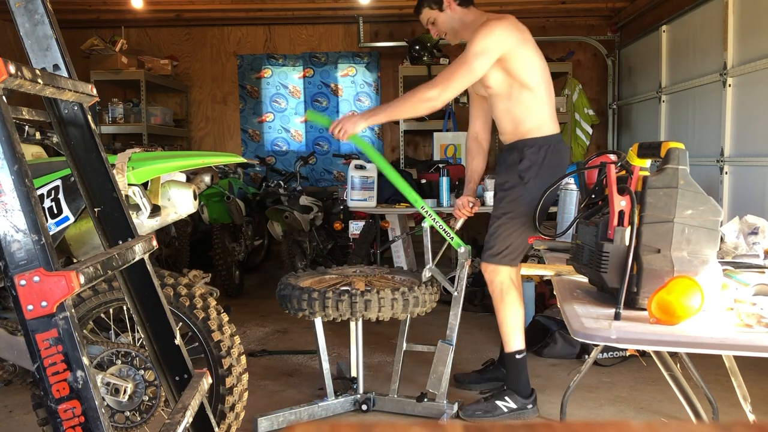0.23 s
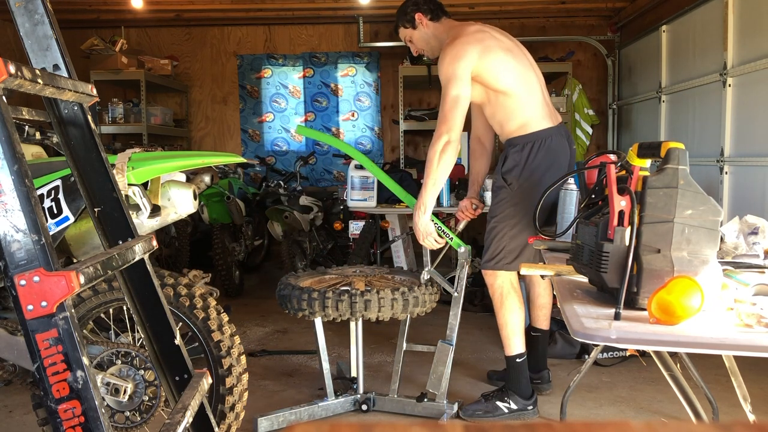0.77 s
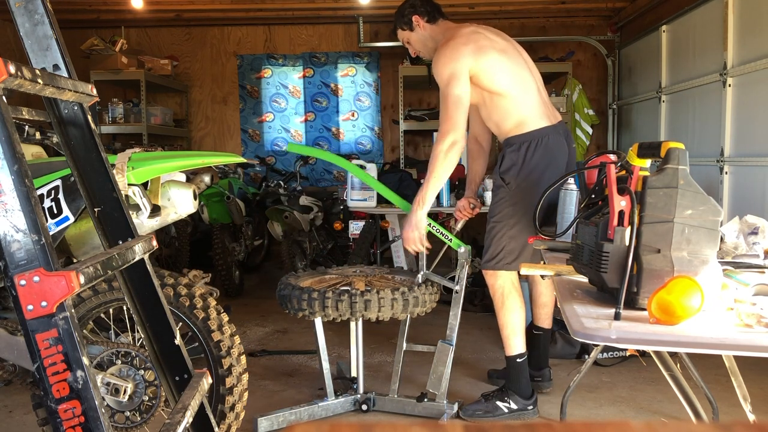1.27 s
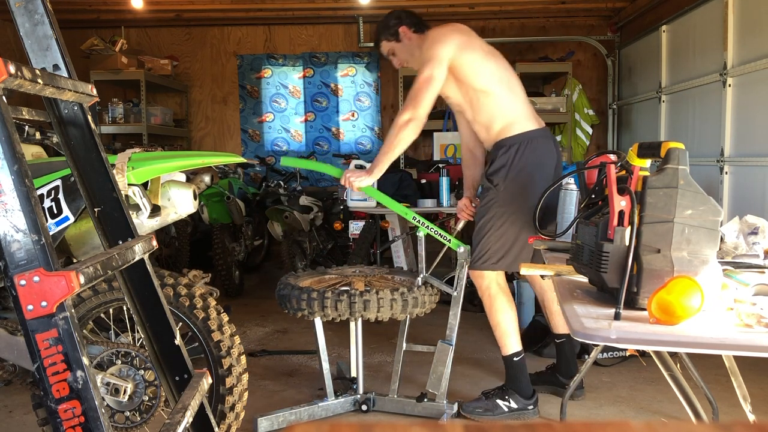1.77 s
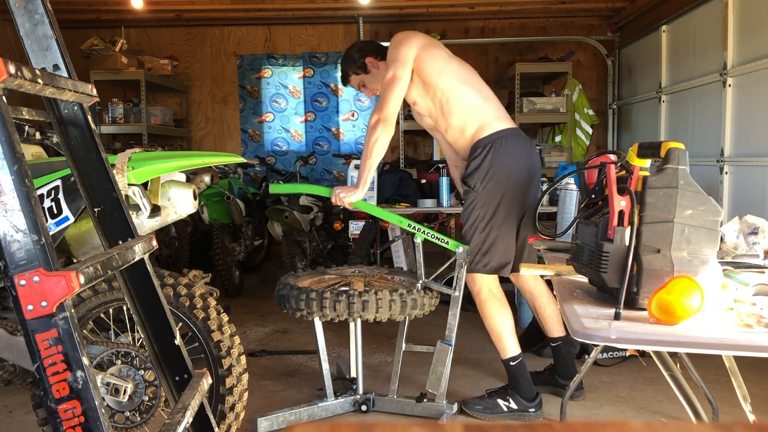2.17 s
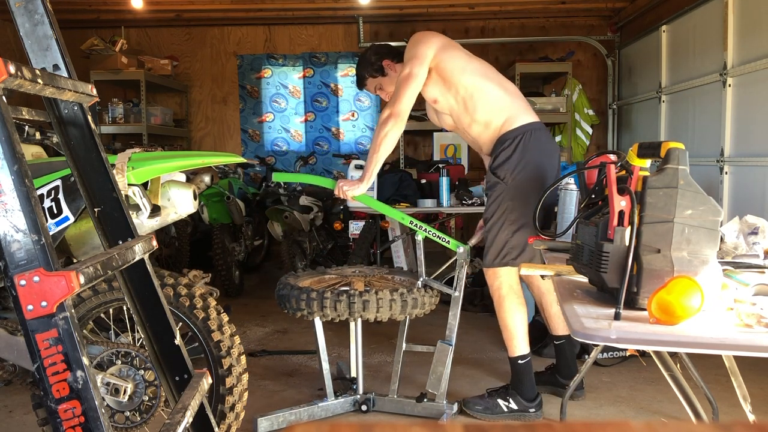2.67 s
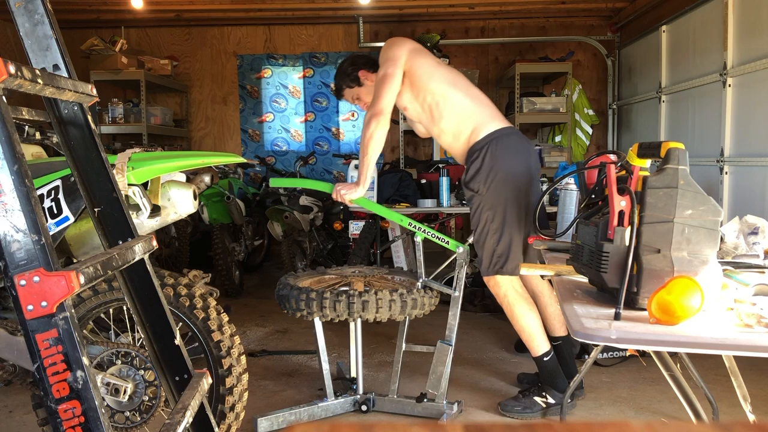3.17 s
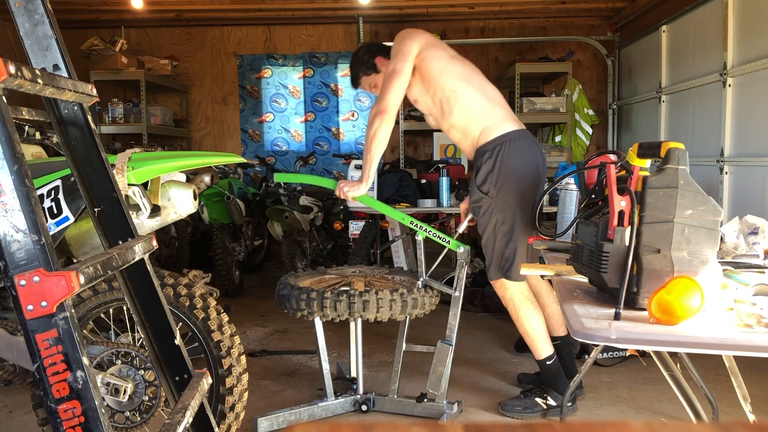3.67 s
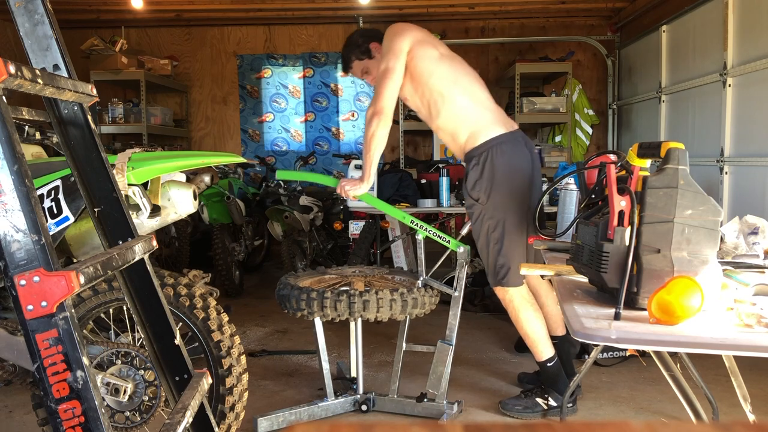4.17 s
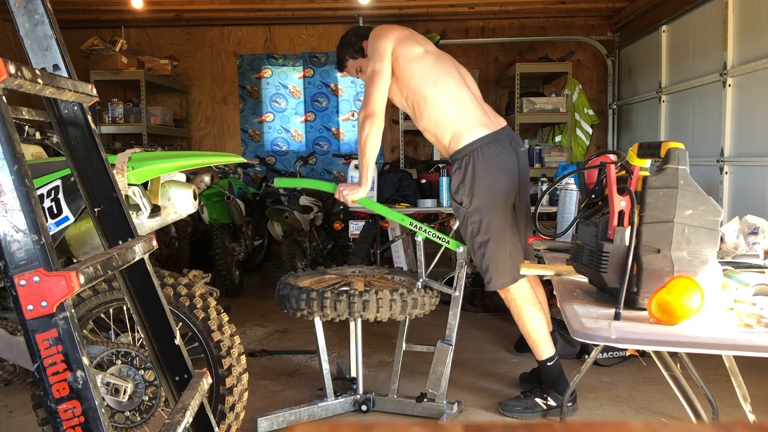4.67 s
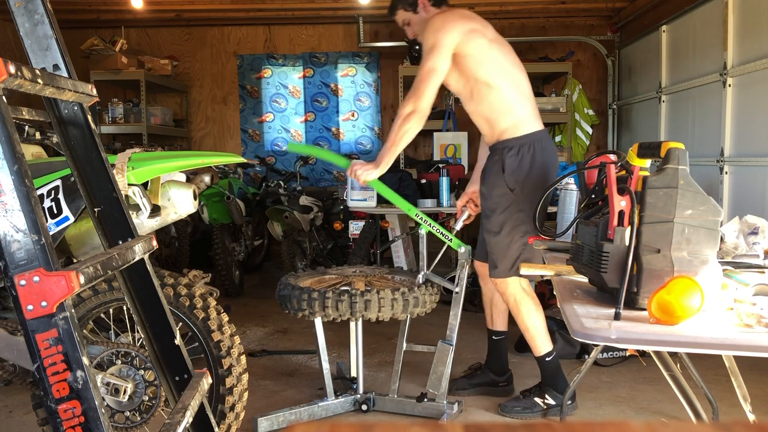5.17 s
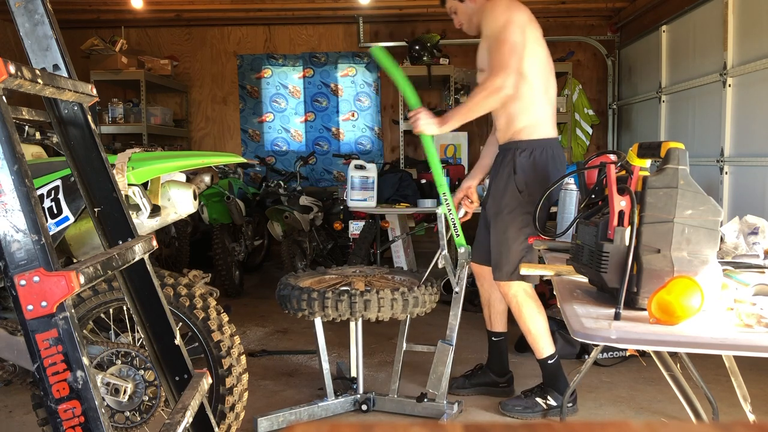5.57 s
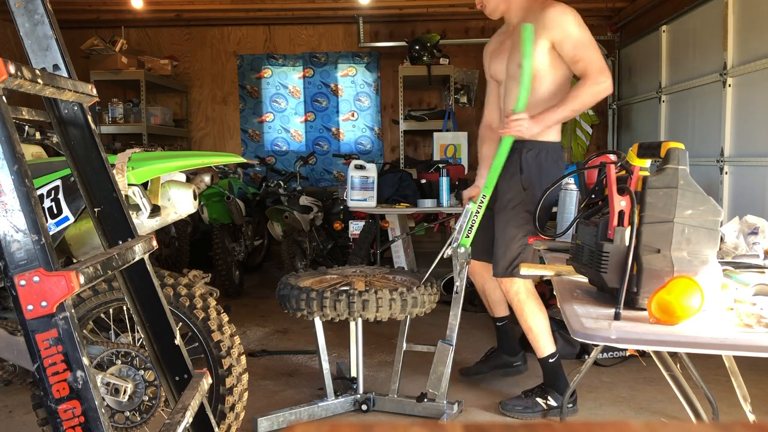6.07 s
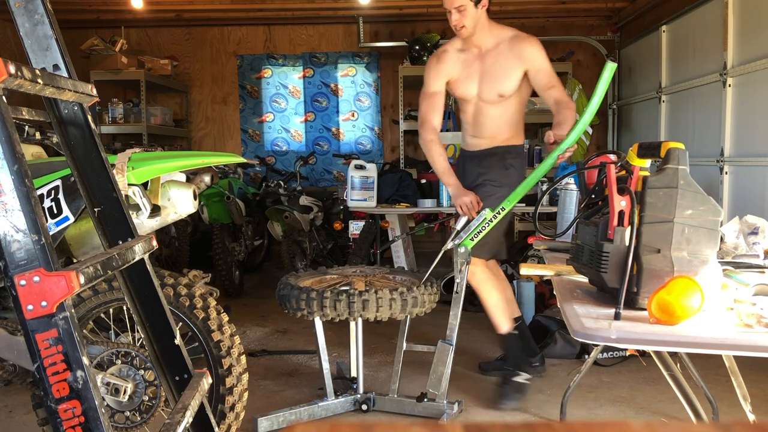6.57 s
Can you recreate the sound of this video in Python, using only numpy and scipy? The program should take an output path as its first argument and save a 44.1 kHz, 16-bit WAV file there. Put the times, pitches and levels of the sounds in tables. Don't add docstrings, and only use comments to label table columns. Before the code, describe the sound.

Sparse metallic clanks, rim knocks, high pin ticks and gritty scrapes as a tire is levered by hand in a bright-echoing garage.

```python
import sys
import numpy as np
from scipy import signal
from scipy.fft import rfft, irfft
from scipy.io import wavfile
from scipy.ndimage import uniform_filter1d

SR = 44100
rng = np.random.default_rng(int(sys.argv[2]) if len(sys.argv) > 2 else 0)


def field_ratio(decibels):
    return 10 ** (np.asarray(decibels, dtype=float) / 20)


def unload_audio(sound):
    columns = np.transpose(np.atleast_2d(sound))
    steps = np.round(np.clip(columns, -1, 1) * 32767)
    wavfile.write(sys.argv[1], SR, steps.astype(np.int16))


N = 300762

# (pitch [Hz], width [Hz], level [dB])
FRAME_MODES = [(950, 60, 0), (1190, 70, -4), (1550, 60, -5), (2200, 60, -3), (2490, 50, -4), (2800, 40, -3),
               (2985, 50, -3), (3250, 70, -3), (3590, 40, -5), (3950, 40, 0), (4180, 50, 0), (4890, 50, -5),
               (5380, 30, -2), (5720, 40, -4), (5860, 40, -3), (6200, 50, -5), (6440, 50, -4),
               (6910, 50, -5), (7260, 50, -5), (7430, 40, -5), (8260, 60, -6), (9180, 40, -7),
               (10900, 70, -11), (13930, 70, -17)]
# (pitch [Hz], width [Hz], level [dB])
RIM_MODES = [(1047, 51, 0), (1213, 51, 28), (1322, 22, 9.5), (1576, 41, 1), (1692, 4.9, -20),
             (1971, 46, -28.5), (2490, 190, 20), (3140, 47, -35.5), (3430, 97, -32.5), (4300, 22, -11.5),
             (5000, 120, -12.5), (6600, 45, -9), (8370, 71, -12.5)]
STEEL_MS = 2.3


def evened(x):
    return x / np.sqrt(np.mean(x ** 2) + 1e-20)


def read(points, hz):
    f, value = np.transpose(points)
    return np.interp(np.log(hz + 1), np.log(f + 1), value)


def add(mix, s, sound):
    part = mix[round(s * SR):][:len(sound)]
    part += sound[:len(part)]


def lasting(rows, value):
    return [(*row, value) for row in rows]


def colour(hz, bass_db, low_db, mid_db, high_db):
    points = [(60, bass_db + 2), (200, bass_db + 7), (900, low_db - 0.5), (3300, mid_db),
              (7400, high_db - 0.5), (10300, high_db - 7), (12200, high_db - 11.0), (15000, high_db - 16)]
    corners, levels_db = zip(*points)
    levels_db = np.array(levels_db)
    at = np.interp(np.log(hz + 1), np.log(corners), np.arange(len(corners)))
    below = np.minimum(at.astype(int), len(corners) - 2)
    from_below = levels_db[below].T * (below + 1 - at)
    from_above = levels_db[below + 1].T * (at - below)
    return (from_below + from_above).T


def ring(modes, luck, damping, tilt_db=0):
    hz, width, db = np.transpose(modes)
    t, k = np.arange(5000)[:, None] / SR, len(modes)
    strength = field_ratio(db + tilt_db + 1.5 * luck[:k]) * np.sqrt(width)
    twin_hz = hz + .9 * width * luck[-k:]
    pair = np.sin(2 * np.pi * hz * t) + .7 * np.sin(2 * np.pi * twin_hz * t)
    dying = np.exp(-np.pi * damping * width * t)
    y = (strength * dying * pair).sum(1)
    return y / np.linalg.norm(y)


def blows(rows, modes, ring_db, rise, damping, tinted, rattle_db, order=1):
    rattle_lasts = 4.2
    out, t, hz = np.zeros(N), np.arange(7000) / SR, np.fft.rfftfreq(7000, 1 / SR)
    mode_hz = np.transpose(modes)[0]
    for (s, db, body_db, edge_db, ms), luck in zip(rows, rng.standard_normal((len(rows), 7060))):
        noise, strike_luck = luck[:len(t)], luck[len(t):]
        contacts = t * 1000 / ms
        force = np.exp(-contacts ** order) * (1 - np.exp(-contacts / rise)) ** 2
        rattle = field_ratio(rattle_db) * force.max() * np.exp(-contacts / rattle_lasts) * np.minimum(contacts, 1)
        tint = [body_db - 16.5, body_db, 0, edge_db]
        chatter = (force + rattle) * evened(irfft(rfft(noise) * field_ratio(colour(hz, *tint))))
        part = ring(modes, strike_luck, damping, tinted * colour(mode_hz, *tint))
        if ms > 3.4:
            jolts = force * noise
        else:
            jolts = np.linalg.norm(force) * (force == force.max())
        y = field_ratio(ring_db) * signal.fftconvolve(jolts, part)
        y[:len(t)] += chatter
        add(out, s, field_ratio(db) * y / abs(y).max())
    return signal.sosfilt(signal.butter(2, 330, "highpass", fs=SR, output="sos"), out)


def air():
    # (pitch [Hz], level [dB per Hz])
    hum = [(15, -26.5), (25, -11.5), (70, 6.5), (141, -4.5), (185, 1.5), (344, -2.5), (560, -0.5),
           (1100, -4.5), (1480, -10.5), (3080, -13), (4030, -11.5), (14800, -27), (16000, -18)]
    frames, hz = N // 256 + 5, np.fft.rfftfreq(1024, 1 / SR)
    a, b, patches = rng.standard_normal((frames, 513, 3)).T
    patches = uniform_filter1d(uniform_filter1d(patches, 10, axis=0), 14, axis=1)
    z = (a + 1j * b) * field_ratio(read(hum, hz)[:, None] + 2.7 * evened(patches))
    return field_ratio(-63) * evened(signal.istft(z, nperseg=1024, noverlap=768)[1][:N])


def rubbing():
    # (hardest moment [s], easing time [s],
    # level [dB], body [dB], edge [dB])
    strokes = [(0., 0.039, -39.5, -1, -6.5), (.21, 0.14, -47.5, 10, -7), (.38, .05, -40.5, -4, -7),
               (.47, 0.24, -50.5, 9, -0.5), (0.606, 0.044, -40.5, 3, -8.5), (1.04, 0.18, -52.5, -1.5, -7),
               (1.227, 0.039, -53, 26.5, 0), (1.42, 0.062, -50, 10, 2), (1.57, .03, -52, -19, -27),
               (1.84, 0.039, -52.5, 9, -3), (1.98, 0.077, -51, 9.5, -6), (2.429, 0.056, -60.5, 10.5, -20),
               (2.75, 0.062, -64, -1, 2), (2.87, 0.059, -54.5, 1, -9), (3.17, 0.12, -57.5, -13, -9),
               (3.72, 0.068, -56, 10, 0), (4.102, 0.07, -59, 3, -8), (4.42, 0.23, -54, -6, -12.5),
               (4.549, 0.071, -52.5, -0.5, -12.5),
               (5.01, 0.062, -51.5, 12, -1.5), (5.153, 0.05, -32, 3.5, -15), (5.32, 0.33, -62.5, 8.5, -13),
             (5.63, 0.064, -62, -11.5, 7.5), (5.93, .04, -41.5, 4, 0), (6.445, 0.039, -42, -3, -11),
             (6.35, .04, -52.5, -2, -20), (5.16, 0.042, -45.5, -15, 7), (5.76, 0.2, -49, -2, 0.5),
             (5.882, 0.14, -47.5, 6, -9), (6.04, 0.29, -51.5, -16, -2), (6.188, 0.12, -45, 4.5, -3),
             (6.35, 0.11, -62, 20.5, -25), (6.5, 0.084, -49.5, -0.5, -4.5), (6.68, 0.061, -52, -3, 2),
             (6.77, 0.073, -38.5, 4.5, -7.5)]
    ease_db, rumble_db = 10, -16
    slip_sizes = field_ratio(1.0 * np.minimum(rng.exponential(1, N), 4))
    slips_per_s = 5000
    slips = slip_sizes * rng.choice([-1., 1.], N) * (rng.random(N) < slips_per_s / SR)
    judder = evened(uniform_filter1d(rng.standard_normal(N), 500))
    rung = signal.oaconvolve(slips, ring(FRAME_MODES, rng.standard_normal(60), damping=1.5))[:N]
    grit = (evened(slips) + field_ratio(-14) * evened(rung)) * field_ratio(2.2 * judder)
    hz, t, z = signal.stft(grit, SR, nperseg=512, noverlap=384)
    s, ease, db, body_db, edge_db = np.transpose(strokes)[:, :, None]
    pressure_db = db - ease_db * abs((t - s) / ease) ** 1.2

    def together(band_db):
        return 10 * np.log10((field_ratio(pressure_db + band_db) ** 2).sum(0) + 1e-12)

    low_db, mid_db, high_db = together(body_db), together(0), together(edge_db)
    z = z * field_ratio(colour(hz, low_db + rumble_db, low_db, mid_db, high_db))
    return signal.istft(z, SR, nperseg=512, noverlap=384)[1][:N]


def squeaks():
    # (time [s], peak [dB], start pitch [Hz], end pitch [Hz], length [s])
    clean = [(0., -47.5, 331, 356, 0.12), (.011, -40, 980, 1060, 0.034), (.09, -49, 1146, 1310, 0.035),
             (.108, -45, 546, 680, 0.041), (.945, -44.5, 2480, 2440, 0.0095),
             (2.418, -50, 2340, 5350, 0.031), (2.419, -46.5, 4670, 7200, 0.0105),
             (2.784, -54.5, 1367, 1370, 0.039), (3.99, -54, 1140, 1150, 0.013),
             (2.7, -58.5, 996, 1700, 0.05), (6.275, -44, 1200, 1170, .03), (6.285, -45, 1670, 1720, 0.027)]
    # (time [s], peak [dB], start pitch [Hz], end pitch [Hz], length [s])
    groans = [(.545, -36.5, 997, 1225, 0.13), (1.411, -31, 864, 1048, .1),
              (1.445, -26.5, 1444, 1850, 0.052), (1.5, -43, 1546, 1300, 0.093),
              (3.412, -60, 920, 1000, 0.096), (3.1, -42, 800, 737, .06), (6.268, -38.5, 1300, 1500, .05),
              (5.4, -42, 1000, 1300, 0.077), (5.096, -33, 1150, 1200, .07), (5.6, -38.5, 1300, 1400, 0.047),
              (5.505, -44, 950, 950, 0.045), (6.705, -31.5, 1595, 1842, 0.06),
              (6.74, -38.5, 429, 299, 0.073), (1.5, -35, 3000, 2800, 0.015), (1.7, -39, 3500, 4000, 0.0175)]
    # (time [s], peak [dB], start pitch [Hz], end pitch [Hz], length [s])
    screeches = [
        (6.3, -38.5, 5600, 4800, 0.17),
        (5.7, -41, 4800, 4500, .15),
        (6.1, -55, 9000, 12000, .12),
        (3.1, -47, 2700, 4800, 0.034),
    ]
    rows = lasting(clean, 30) + lasting(groans, 310) + lasting(screeches, 2300)
    out = np.zeros(N)
    for (s, db, start_hz, end_hz, length, width_hz), luck in zip(rows, rng.standard_normal((len(rows), 2, 9000))):
        hz = np.linspace(start_hz, end_hz, min(round(length * SR), 7000))
        hold = np.exp(-np.pi * width_hz / SR)
        wander = signal.lfilter([1], [1, -2 * hold, hold ** 2], luck[0] + 1j * luck[1])[-len(hz):]
        tone = (wander * np.exp(2j * np.pi * np.cumsum(hz) / SR)).real
        add(out, s, field_ratio(db) * signal.windows.tukey(len(hz), .5) * tone / abs(tone).max())
    return out


def iron_bounces():
    # (time [s], peak [dB], body [dB], edge [dB])
    bounces = [(6.2697, -25, -2, -18), (6.4025, -20, 2, -13), (6.4148, -20.5, -3, -19), (7.3, -23, 3, 0),
               (5.8, -29, 6, -10), (7, -34, 8, -15), (8.2, -40, 1, -12), (0.67, -31, 2, -3),
               (0.12, -43, 5, -20), (5.921, -29, 3, -8), (5.972, -33, -3, -15), (5.124, -30, 5, -15),
               (5.133, -28, 5, -15), (6.6323, -39, -5, -5), (6.7086, -30, 0, -8)]
    # (pitch [Hz], width [Hz], level [dB])
    iron = [(970, 96, -7), (1360, 140, 7.5), (1740, 140, 3), (2200, 150, -2), (2760, 140, 3.5),
            (3230, 140, -6.5), (5000, 220, -15)]
    contact_ms = .8
    return blows(lasting(bounces, contact_ms), iron, ring_db=13, rise=.35, damping=1.0, tinted=.8, rattle_db=-12)


def frame_clanks():
    # (time [s], peak [dB], body [dB], edge [dB], contact time [ms])
    clanks = [
        (.331, -19, 2, 3, 5.5),
        (1.183, -6.5, -9, 0, 4.35),
        (5.0925, -12, -1, 9, 2.6),
        (5.894, -19, -1, -4.5, 3.6),
    ]
    # (time [s], peak [dB], body [dB], edge [dB], contact time [ms])
    touches = [
        (0.132, -30.5, -3, 4, 6),
        (0.315, -32, -8, 6, 4.8),
        (0.325, -19.5, -11, -3, 5.7),
        (1.162, -32, -6, -14.5, 5.2),
        (1.173, -30, -4.5, 2, 4.4),
        (.178, -25, -0.5, -4.5, 15),
        (5.086, -23.5, 0, -31, 6.6),
    ]
    return blows(clanks + touches, FRAME_MODES, ring_db=-20, rise=.6, damping=2.2, tinted=.55, rattle_db=-7.5)


def rim_knocks():
    # (time [s], peak [dB], body [dB], edge [dB])
    knocks = [(.146, -24.5, -1.5, -19), (.832, -40.5, 13, -9), (1.796, -30, -7, -6.5), (2., -37, 2, -2),
              (3.656, -30, 0, -8), (3.994, -46, 4, -23), (4.092, -44, -2, -9), (5.391, -45.5, -7, -11),
              (6.329, -36.5, 30, -8), (6.438, -38, 0, 0), (6.585, -37.5, 16, -16), (6.665, -53, -6, -13)]
    # (time [s], peak [dB], body [dB], edge [dB])
    snaps = [
        (1.813, -27.5, 2, -5),
        (2.025, -26.5, 8, -5),
        (2.881, -35.5, 28, -17),
    ]
    knock_ms, snap_ms = 2.4, 0.27
    rows = lasting(knocks, knock_ms) + lasting(snaps, snap_ms)
    return blows(rows, RIM_MODES, ring_db=-2.5, rise=0.11, damping=3.5, tinted=.9, rattle_db=-8.5)


def scuffs_and_drags():
    # (time [s], peak [dB], body [dB], edge [dB])
    scuffs = [
        (1.99, -32, 6, -8),
        (2.419, -42.5, -24, 4),
        (2.853, -36, 6, -7),
        (4.123, -37, 2.5, -9),
        (4.974, -36, 7, -24),
        (5.015, -43, 9, 15),
        (6.264, -69, 2, -11),
    ]
    # (time [s], peak [dB], body [dB], edge [dB])
    drags = [(.191, -30, -9, -8), (1.436, -25, -2, -9.5), (1.457, -29.5, -8, -14),
             (1.814, -26.5, 5.5, -6.5), (2.709, -48, -2, -5), (3.057, -29.5, 11, -6.5),
             (3.664, -42.5, 30, -6.5), (3.782, -39, 11.5, -29), (4.823, -35.5, -9.5, -14.5),
             (6.63, -29, -9, -5.5), (6.704, -22, -7, -13.5)]
    scuff_ms, drag_ms = 51.4, 79
    rows = lasting(scuffs, scuff_ms) + lasting(drags, drag_ms)
    return field_ratio(-4.0) * blows(rows, RIM_MODES, ring_db=-10.0, rise=0.046, damping=5.9, tinted=1, rattle_db=-22, order=2)


def thumps():
    # (time [s], peak [dB], pitch [Hz], length [s])
    landings = [(.2, -46, 167, 0.096), (.34, -47, 160.4, 0.066), (1.19, -44, 144, 0.082),
                (1.398, -43, 249, 0.056), (2.396, -46.5, 150, 0.093), (5.152, -44, 146, 0.079),
                (5.166, -58, 59.3, 0.14), (1.8, -61, 173, 0.14), (2.9, -58, 159, 0.044),
                (3.748, -55, 292, 0.068), (6.327, -55, 246, 0.097), (5.52, -54.5, 168, 0.063),
                (5.68, -54.5, 167, 0.042), (5.92, -49, 165, 0.1), (6.741, -44.5, 256, 0.099)]
    out = np.zeros(N)
    for s, db, hz, length in landings:
        u = np.arange(0, 1, 1 / (length * SR))
        swell = np.sin(np.pi * u ** 0.48) ** 2
        add(out, s, field_ratio(db) * swell * np.sin(2 * np.pi * hz * length * u))
    return out


def clangs():
    # (time [s], peak [dB], contact time [ms])
    strikes = [
        (.333, -25, 2.8),
        (1.186, -15, 3.3),
        (5.094, -24.5, 2.4),
        (5.896, -25.5, 2.8),
    ]
    # (pitch [Hz], level [dB], time to fall 60 dB [s])
    post = [(770, -6, .2), (2207, 3, 0.33), (2665, -10, .3), (2966, -9, .3), (3850, -7, 0.074),
            (4800, -5, .18), (5400, -3, .23), (5787, 4, .1), (6100, -6, .1), (7397, -8, .29),
            (8290, -14, .3), (8915, -16, .3)]
    arm = [(229, -7, 0.23), (950, 0, .45), (1148, -2, 0.34), (1710, -7, .3), (2040, -12, .2),
           (2368, -10, .2), (2790, -5, .23), (2998, -9, .3), (3230, -7, .15), (3960, 5.5, 0.22),
           (4190, 4, .18), (4760, -8, .3), (5383, -2, .35), (5790, -3, 0.25), (7430, -7, 0.5),
           (9173, -16, .3)]
    hub = [(860, -8, .4), (1080, -5, .4), (1170, -8, .5), (1810, -6, 0.46), (2020, 0, .2), (2220, -1, .4),
           (3591, -3, .3), (4490, -4, .25), (5879, -3, .3), (6918, 1, .25), (7241, 2, .2), (8258, 1, .3),
           (8888, -8, .3), (11200, -5, .15)]
    latch = [(792, -11, .3), (978, -6, 0.34), (1910, -1, .08), (2340, 4, 0.12), (4020, -1, .15),
             (5070, -16, .19), (5840, -10, .3), (6170, -6, 0.17), (7300, -15, .3), (9000, -8, .3),
             (9098, -5, .3)]
    grip, shimmer_hz = 0.55, 20
    out, t = np.zeros(N), np.arange(16000)[:, None] / SR
    for (s, db, ms), modes, luck in zip(strikes, (post, arm, hub, latch), rng.standard_normal((len(strikes), 600))):
        hz, mode_db, t60 = np.transpose(modes)
        beat = np.cos(2 * np.pi * shimmer_hz * luck[-len(hz):] * t) + .4
        part = (field_ratio(mode_db - 60 * t / (grip * t60)) * beat * np.sin(2 * np.pi * hz * t)).sum(1)
        jolts = np.sign(luck) * np.exp(-np.arange(len(luck)) * 1000 / SR / ms * 10)
        y = signal.fftconvolve(jolts, part)
        y = y * np.minimum(np.arange(len(y)) * 1000 / SR / ms, 1)
        add(out, s, field_ratio(db) * y / abs(y).max())
    return out


def lever_hits():
    # (time [s], peak [dB], body [dB], edge [dB])
    hits = [
        (.944, -37.5, 10, -40),
        (1.324, -26, -30, -15),
        (3.782, -33, -5, -40),
        (5.433, -32.5, 1, -16),
        (5.454, -63, -18, 4),
        (5.495, -32, -10, -13),
    ]
    # (pitch [Hz], width [Hz], level [dB])
    lever = [(950, 60, -23), (1326, 79, 18), (1960, 80, -5), (2280, 60, -5.5), (2330, 26, 16.5),
             (2790, 70, 1.5), (3200, 96, 1.5), (3820, 95, -0.5), (5330, 80, -6), (6760, 99, -1)]
    return blows(lasting(hits, STEEL_MS), lever, ring_db=0.0, rise=0.1375, damping=7.6, tinted=.9, rattle_db=-7.5)


def pin_ticks():
    # (time [s], peak [dB], body [dB], edge [dB])
    ticks = [
        (1.1278, -50, -13, 9),
        (2.0694, -27.5, -17, 9),
        (2.315, -25, -12, 8),
        (2.5668, -28.5, -28, 7),
        (3.549, -35.5, -13, -1),
        (4.058, -69, -19, 6),
        (4.9511, -44, -12, 9),
        (5.5952, -27.5, -20, 11),
        (5.862, -26, -19, 22),
        (6.084, -25.5, -42, -2),
    ]
    # (pitch [Hz], width [Hz], level [dB])
    pin = [(3050, 40, -16), (4400, 120, -15), (5220, 60, -5), (5600, 60, -5), (6090, 80, -1), (6420, 40, 0),
           (6900, 90, -4), (7350, 120, -4), (8000, 100, -7), (8640, 50, -2), (9300, 90, -6),
           (10300, 120, -12), (11400, 80, -11), (12600, 60, -8), (13600, 90, -9), (14500, 50, -4),
           (15450, 60, -4)]
    return blows(lasting(ticks, STEEL_MS), pin, ring_db=1.5, rise=.2, damping=1.7, tinted=.3, rattle_db=-9)


def bar_hit():
    # (time [s], peak [dB], body [dB], edge [dB])
    hits = [
        (2.2, -24, 4, -7),
    ]
    # (pitch [Hz], width [Hz], level [dB])
    bar = [(535, 30, -9), (1100, 60, 0), (1340, 40, -10), (2610, 50, -4), (3330, 50, -11), (3560, 40, -5),
           (3700, 40, -6), (4650, 80, -11), (4800, 80, -12), (5040, 50, -15), (5900, 90, -14),
           (6600, 80, -11), (7000, 80, -11), (7800, 70, -15), (11000, 90, -16)]
    return blows(lasting(hits, STEEL_MS), bar, ring_db=12, rise=.3, damping=1.2, tinted=0, rattle_db=-9)


def garage(x, tail_db):
    # (pitch [Hz], time to fall 60 dB [s])
    tail_times = [(120, 0.7), (400, 0.31), (1000, 0.48), (2500, 0.43), (6000, 0.35), (12000, 0.24)]
    # (delay [ms], level [dB])
    echoes = [
        (3.1, -33.5),
        (6.5, -20.5),
        (9.4, -28.5),
        (14, -32),
        (19, -22),
    ]
    out = x.copy()
    for ms, db in echoes:
        add(out, ms / 1000, field_ratio(db) * x)
    hz, t, z = signal.stft(rng.standard_normal((3, SR // 2)), SR, nperseg=256)
    tails = signal.istft(z * field_ratio(-60 * t / read(tail_times, hz)[:, None]), SR, nperseg=256)[1]
    tails = tails * (1 - np.exp(-np.arange(tails.shape[1]) / (0.0028 * SR)))
    tails = tails / np.linalg.norm(tails, axis=1)[:, None]
    turn = 2 * np.pi * (np.arange(N) * 2.3 / SR + np.arange(3)[:, None] / 3)
    feeds = np.sqrt(2 / 3) * np.cos(turn) * x
    wet = signal.fftconvolve(feeds, tails, axes=1)[:, :N].sum(0)
    return out + field_ratio(tail_db) * wet


def scene():
    soft = field_ratio(1.5) * rubbing() + squeaks() + scuffs_and_drags()
    clanks = iron_bounces() + frame_clanks() + clangs()
    hits = rim_knocks() + lever_hits() + pin_ticks() + bar_hit()
    room = garage(hits, tail_db=0.9) + garage(soft, tail_db=-3.5) + garage(clanks, tail_db=-1.3)
    return (room + thumps() + air())[None]


def band_limit(x):
    return signal.sosfilt(signal.butter(12, 16820, fs=SR, output="sos"), x)


def record(dry):
    edge_hz = 15780
    thin = signal.sosfilt(signal.butter(3, 56, "highpass", fs=SR, output="sos"), dry)
    steep = signal.firwin(255, edge_hz, window=("kaiser", 7), fs=SR)
    cut = signal.oaconvolve(thin, steep[None], "same")
    mix = cut + field_ratio(-38) * (thin - cut)
    return band_limit(mix)


dry = scene()
out = record(dry)
unload_audio(out)
```